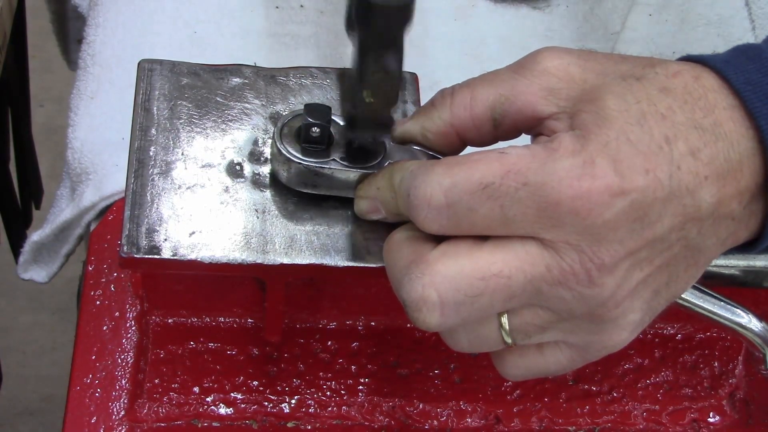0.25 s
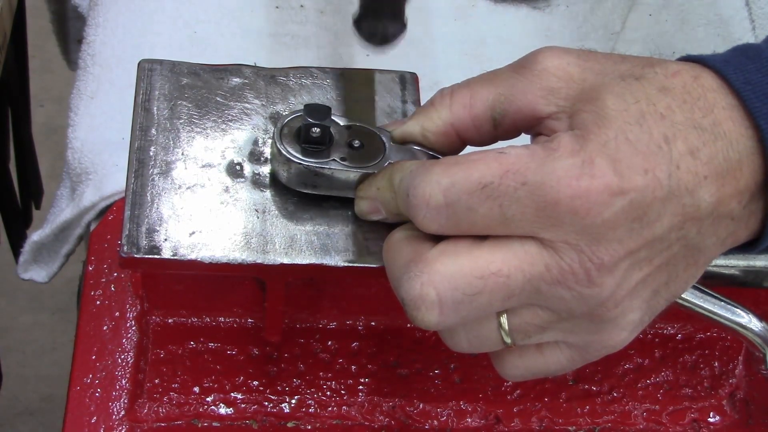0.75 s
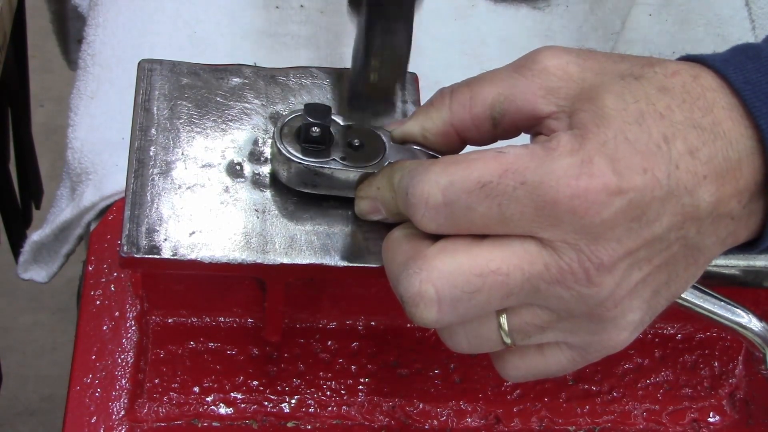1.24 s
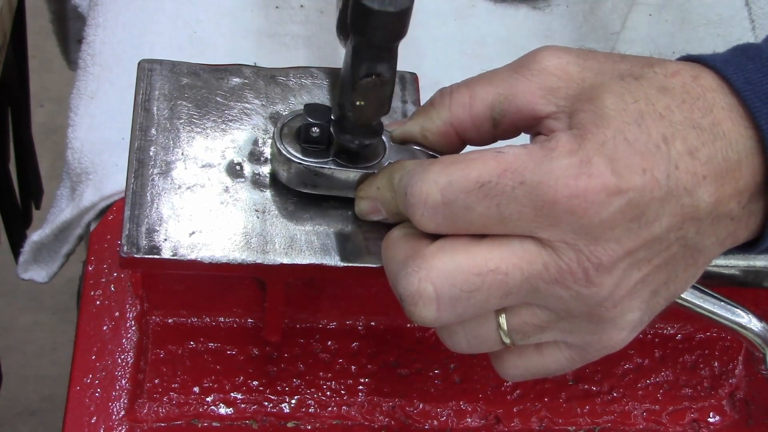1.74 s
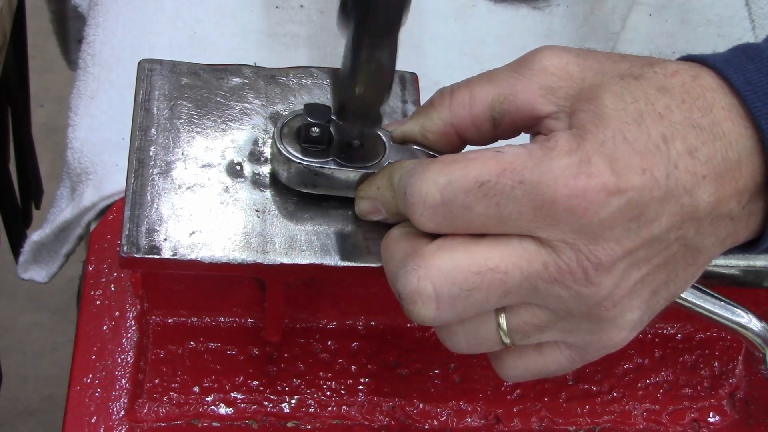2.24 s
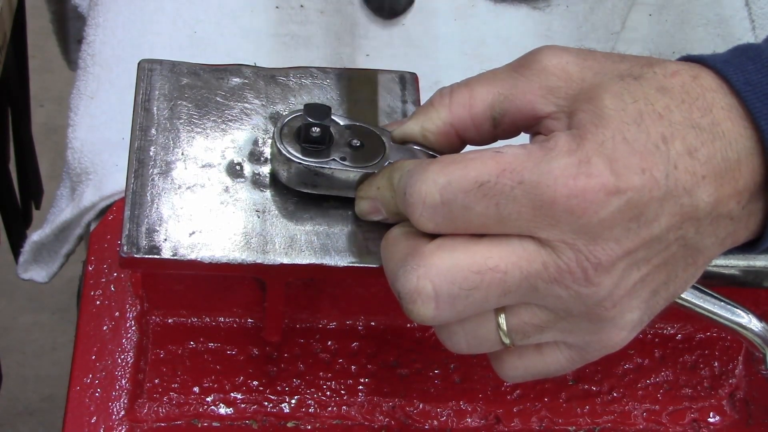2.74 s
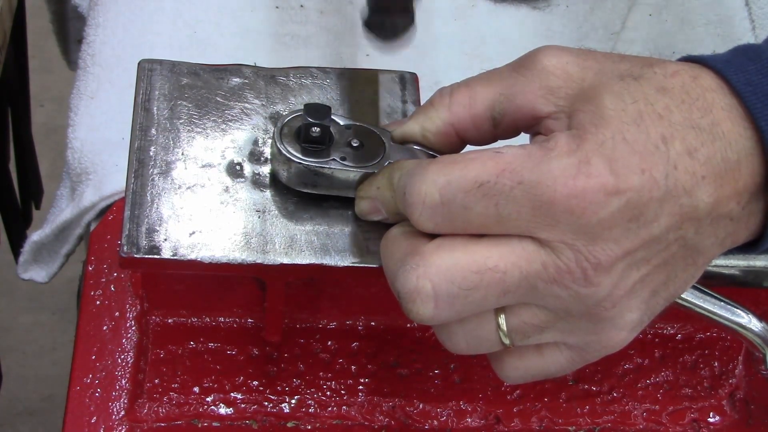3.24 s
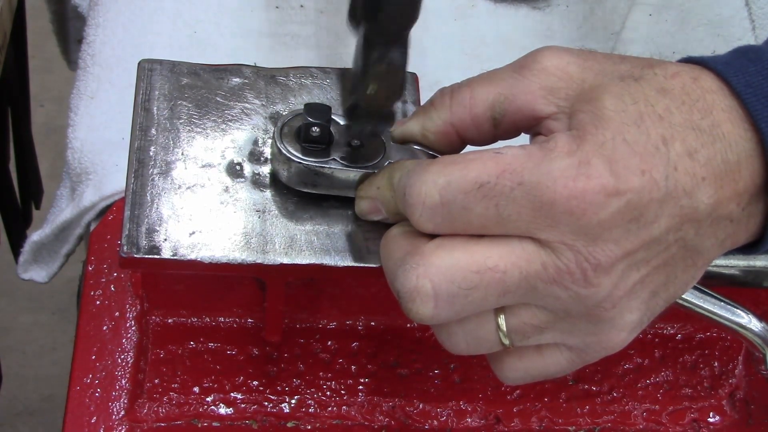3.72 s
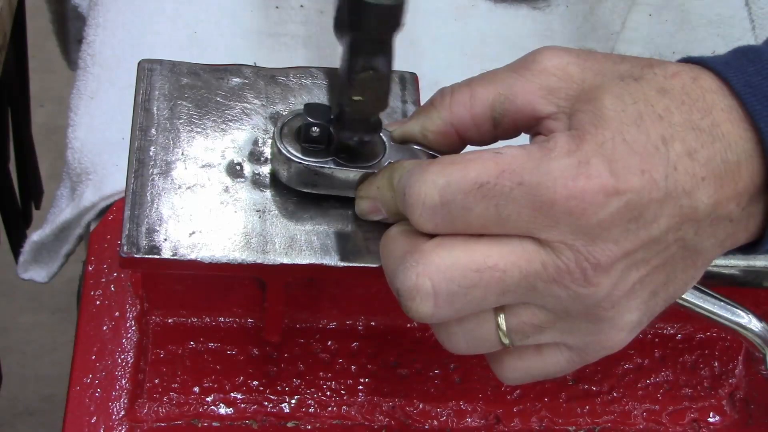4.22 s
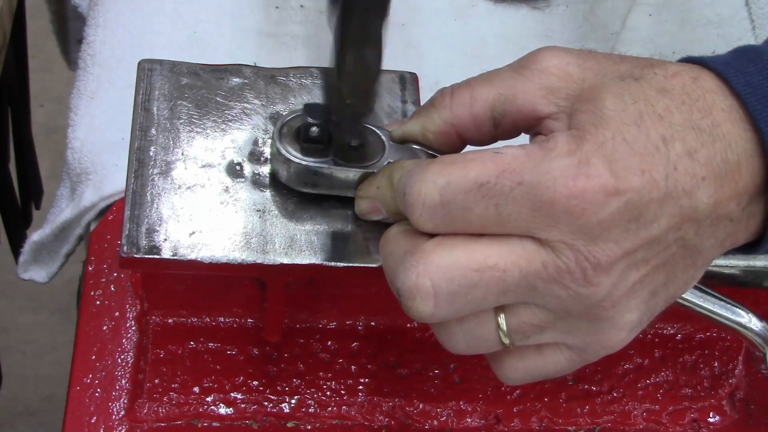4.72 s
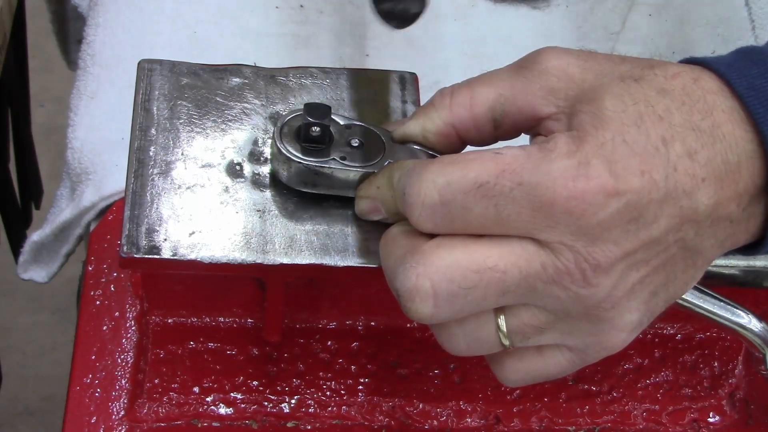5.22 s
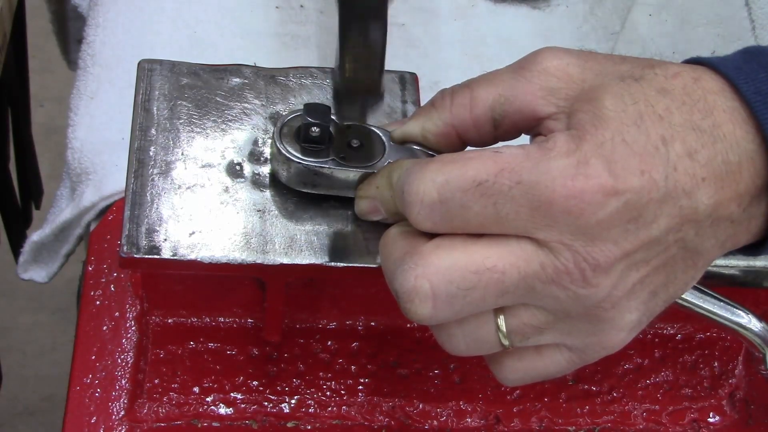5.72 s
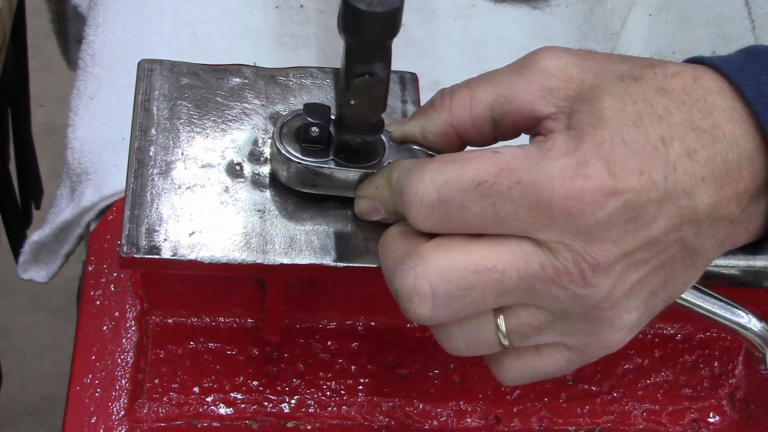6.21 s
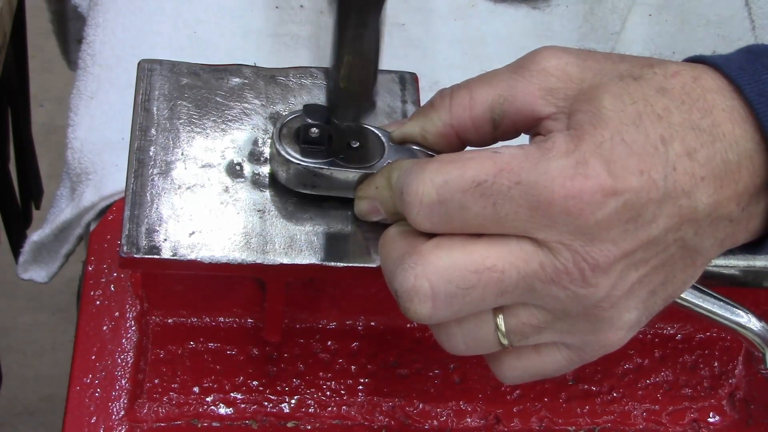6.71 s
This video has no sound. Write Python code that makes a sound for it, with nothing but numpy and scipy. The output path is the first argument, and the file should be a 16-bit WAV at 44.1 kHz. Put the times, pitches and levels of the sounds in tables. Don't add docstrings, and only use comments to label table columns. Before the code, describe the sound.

A small hammer strikes a steel pin in a link held on an anvil, close to the microphone, at an even three to four blows a second. Each blow is a sharp tick and hard, choked clank, often followed by a lighter rebound click, with a dull bench thud beneath. A bare workshop answers with short bright reverberation, swelling slightly after the loud hits, over faint building murmur.

```python
import sys
import numpy as np
from scipy import signal
from scipy.fft import rfft, irfft
from scipy.io import wavfile
from scipy.ndimage import uniform_filter1d, minimum_filter1d

SR = 44100
rng = np.random.default_rng(int(sys.argv[2]) if len(sys.argv) > 2 else 0)


def rack_gain(trim_db):
    fader = np.asarray(trim_db, float)
    return 10 ** (fader / 20)


def wav_record(signal):
    frames = np.transpose(np.atleast_2d(signal))
    bounded = np.clip(frames, -1, 1)
    quanta = np.round(bounded * 32767).astype(np.int16)
    wavfile.write(sys.argv[1], SR, quanta)


N = 306936
LEAD = SR // 2

# start in seconds, peak in dB.
HAMMER_TICKS = [(.5630, 7), (0.8485, 0), (0.855, -10), (1.1587, 5), (1.166, -9.5), (1.7190, -1),
                (2.0090, 0), (2.8404, 5.5), (3.1239, 3.5), (3.3918, 7), (3.4015, -12), (3.6805, -0.5),
                (3.9430, 5.5), (4.231, 9), (4.498, 5), (4.771, 7), (5.3386, 3.5), (5.348, -8), (5.6310, -2),
                (5.9162, -0.5), (6.2020, -2), (6.4633, -1.5), (6.47, -5.5), (6.7620, 2.5)]
# start in seconds, ring in dB, upper modes in dB, link clang in dB.
LINK_SLAMS = [(-.2900, 5.5, 15, -15), (-.0080, 0, -6, -1.5), (.2840, 0, -5, 0.5), (0.5659, -4.5, 1, 7.5),
              (.8500, -6.5, 3.5, 2.5), (1.1600, -6.5, 0, 6), (1.444, 6, -3, -2.5), (1.7239, 6.5, -5.5, 4.5),
              (2.0123, 9, -2, 2.5), (2.2876, 8, -3.5, 2), (2.5687, 9.5, -1, 5), (2.8415, 10, -2, 3.5),
              (3.1261, 8, -4, 2.5), (3.393, -8, 1, 12.5), (3.685, 7.5, -3.5, 5), (3.9470, 8.5, -2, 4.5),
              (4.237, 5.5, -4.5, 0), (4.5020, 10, -4, 2.5), (4.775, -2.5, -0.5, 1.5), (5.0549, 8, -4, 4),
              (5.34, -1, -9, -19), (5.637, 6, -1, 5), (5.9200, .5, -6.5, 1.5), (6.2057, 6, -2, 3.5),
              (6.4660, -4.5, -4, -1), (6.7734, -5.5, -2.5, 1)]
# start in seconds, ring in dB, upper modes in dB, link clang in dB.
LINK_BOUNCES = [(.3030, -11, -11, -15), (0.5887, -5, -3, 4.5), (.8640, -9, -12, 4), (1.1701, -11, -15, -2),
                (1.4642, -3, -6, 4), (1.7395, -7.5, 1.5, 7.5), (2.0322, -2, -6, 5), (2.305, -13, -17, 10),
                (2.589, -6, -1, 5.5), (2.8618, -10, 1, 3), (3.147, -2.5, -5, 6.5), (3.3995, -1, 1, -2.5),
                (3.4220, -11.5, -10, 2), (3.7186, -6, -17, -6.5), (3.9680, -10, -3.5, 6.5),
                (4.257, -4, -9, 5.5), (4.5225, 1.5, -8, 2), (4.788, -10, -8, 8), (5.0924, -12, -8, 10),
                (5.6693, -4, -10.5, 3), (6.2250, -5.5, -12, -1), (6.7920, -7, -10, -4.5)]

# frequency in Hz, level in dB, T60 in seconds.
PIN_MODES = [(1630, -13, 0.0097), (3666, -16, 0.049), (4367, -4, 0.011), (4844, -7, 0.0094),
             (7150, -12, 0.012), (9220, -7, 0.0032), (10350, -14.5, 0.0041), (12250, -23, 0.009)]
ANVIL_MODES = [(1246, -18, 0.068), (1600, -39, 0.026), (1621, -18.5, 0.073), (1694, -24.5, 0.17),
               (1937, -24, 0.077), (2355, -6.5, 0.054), (2357, -5, .04), (2300, -54, 0.09),
               (3410, -19, 0.039)]
UPPER_MODES = [(3890, -7.5, 0.048), (4670, -13.5, 0.029), (4860, -24, 0.013), (5384, -2, 0.035),
               (6410, -24, 0.11), (7700, 1, 0.012), (7910, -0.5, 0.024), (8190, -9, 0.012),
               (9970, -25.5, 0.092), (11400, -19, 0.019), (13600, -41, .02), (14500, -36, .03)]
LINK_MODES = [(2734, -13, .045), (2860, -14, .025), (3090, -9, .025), (3220, -13, .025), (2956, -4, .04)]
BENCH_MODES = [(165, -13, 0.19), (255, 0, 0.15), (279.6, -2, 0.18), (329, -14, 0.11), (440, -5, 0.064),
               (508.6, -5.5, 0.08), (579, -4, 0.074), (614, -10, 0.074), (775.4, -5, 0.073),
               (896, -14.5, 0.32)]

# frequency in Hz, density in dB per Hz.
CRACK_SPECTRUM = [(600, -17.5), (1100, -19.5), (1650, -9.5), (2100, -26), (2700, 2.5), (3400, -4),
                  (4500, -9), (6500, -13), (8000, -31), (11000, -28), (14500, -29), (17000, -47)]
HUSH_SPECTRUM = [(40, -18), (100, -5), (300, 4), (1000, -9), (4000, -16), (12000, -41), (16000, -62)]
RUMBLE_SPECTRUM = [(20, -27), (40, -17), (60, -6), (85, -1), (130, -7), (300, -43)]

# frequency in Hz, level in dB, T60 in seconds, side level in dB.
ROOM_BANDS = [(119, -33.5, 1, -25), (238, -35.5, 0.27, -53), (516, -27, 0.89, -33), (1110, -36, 0.9, -23.5),
              (1667, -28.5, 0.99, -21.5), (2350, -39.5, 0.95, -16.5), (3520, -41, 0.72, -16.5),
              (5840, -39, 0.5, -11), (8040, -40, 0.26, -13.5), (11300, -50, 0.35, -39),
              (14900, -42.5, 0.27, -31)]
# delay in seconds, level in dB.
WALL_ECHOES = [
    (0.059, -23.5),
    (0.073, -27.5),
]

SPREAD_DB = 1
SLAM_THUD_DB, BOUNCE_THUD_DB, THUD_FOLLOWS = -14, -13, 0.16
SLAM_MS, BOUNCE_MS, SPREAD_MS_PER_S, HARD_MS_PER_DB = 4.3, 2.2, 0.35, 0.08
SLAM_CRACK_DB, TICK_CRACK_DB, CRACK_T60_S = -9, -15, 0.021
PIN_SEND_DB, RING_SEND_DB, CRACK_SEND_DB = -5.5, -5.5, 5.5
BUILD_S, ECHO_CUT_HZ = 0.0022, 5000
HUSH_DB, RUMBLE_DB = -42, -58.5
MIC_LOW_HZ, MIC_TOP_HZ, PORT_LAG_DB = 175, 15400, -29.5
CEILING_DB, SENSE_S, AHEAD_S, HOLD_S, RELEASE_DB_S = -4.5, 0.0021, 0.0018, 0.016, 285


def at_hz(table, column, hz):
    table = np.array(table)
    return np.interp(np.log(hz), np.log(table[:, 0]), table[:, column])


def coloured(spectrum, channels):
    size = LEAD + N
    hz = np.maximum(np.fft.rfftfreq(size, 1 / SR), 20)
    white = rfft(rng.standard_normal((channels, size)))
    noise = irfft(white * rack_gain(at_hz(spectrum, 1, hz)), size)
    return noise / noise.std()


def hush():
    return rack_gain(HUSH_DB) * coloured(HUSH_SPECTRUM, channels=2) * [[1], [rack_gain(-19)]]


def mic_rumble():
    rumble, sideways = coloured(RUMBLE_SPECTRUM, channels=2)
    return rack_gain(RUMBLE_DB) * (rumble + rack_gain(-16) * sideways * np.array([[1], [-1]]))


def landings():
    slams = [(*row, SLAM_THUD_DB, SLAM_MS) for row in LINK_SLAMS]
    bounces = [(*row, BOUNCE_THUD_DB, BOUNCE_MS) for row in LINK_BOUNCES]
    rows = np.array(slams + bounces)
    s, ring_db, upper_db, clang_db, thud_db, start_ms = rows[np.argsort(rows[:, 0])].T
    thud_db = thud_db + THUD_FOLLOWS * ring_db
    contact_ms = start_ms + SPREAD_MS_PER_S * s - HARD_MS_PER_DB * ring_db
    return s, ring_db, thud_db, upper_db, clang_db, contact_ms


def struck(modes, s, peak_db, contact_ms, grains, soft_hz):
    out = np.zeros(LEAD + N)
    when = rng.random((len(s), grains)) * np.clip(contact_ms, 0.05, 12)[:, None] / 1000
    when[:, 0] = 0
    at = LEAD + np.round((s[:, None] + when) * SR).astype(int)
    sign = rng.choice([-1, 1], at.shape)
    push = rng.uniform(0.87, 1, at.shape) * sign / np.sqrt(grains)
    luck = rng.standard_normal((len(s), len(modes)))
    for k, (hz, level_db, t60) in enumerate(modes):
        r = rack_gain(-60 / (t60 * SR))
        w = 2 * np.pi * hz / SR
        drive = np.maximum(np.abs((push * np.exp(1j * w * at)).sum(axis=1)), 0.45)
        strength = rack_gain(peak_db + level_db + SPREAD_DB * luck[:, k]) / drive
        clicks = np.full(LEAD + N, 1e-18)
        np.add.at(clicks, at, push * strength[:, None])
        out += signal.lfilter([0, np.sin(w)], [1, -2 * r * np.cos(w), r * r], clicks)
    return signal.sosfilt(signal.butter(4, soft_hz, fs=SR, output="sos"), out)


def anvil():
    s, ring_db, _, upper_db, clang_db, contact_ms = landings()
    body = struck(ANVIL_MODES, s, ring_db - 1.5, contact_ms, grains=8, soft_hz=5530)
    clang = struck(LINK_MODES, s, ring_db + clang_db + 0.5, contact_ms, grains=8, soft_hz=5530)
    upper = struck(UPPER_MODES, s, ring_db + upper_db - 2, contact_ms, grains=8, soft_hz=12000)
    return body + clang + upper


def crack():
    slam_s, ring_db = landings()[:2]
    tick_s, tick_db = np.transpose(HAMMER_TICKS)
    starts = np.zeros(LEAD + N)
    starts[LEAD + np.round(slam_s * SR).astype(int)] = rack_gain(ring_db + SLAM_CRACK_DB)
    starts[LEAD + np.round(tick_s * SR).astype(int)] += rack_gain(tick_db + TICK_CRACK_DB)
    fade = signal.lfilter([1], [1, -rack_gain(-60 / (CRACK_T60_S * SR))], starts)
    return fade * coloured(CRACK_SPECTRUM, channels=1)[0]


def bench():
    s, _, thud_db, _, _, contact_ms = landings()
    return struck(BENCH_MODES, s + 0.00195, thud_db - 4.5, contact_ms, grains=4, soft_hz=1510)


def pin():
    s, peak_db = np.transpose(HAMMER_TICKS)
    contact_ms = np.full(len(s), 1.3)
    return struck(PIN_MODES, s, peak_db + 0.5, contact_ms, grains=4, soft_hz=14100)


def evened(tail, fine_hz, broad_hz):
    spectrum = rfft(tail, 2 * SR)
    power = np.abs(spectrum) ** 2
    fine = uniform_filter1d(power, round(2 * fine_hz), axis=1) + 1e-15
    broad = uniform_filter1d(power, round(2 * broad_hz), axis=1) + 1e-15
    return irfft(spectrum * np.sqrt(broad / fine))[:, :SR]


def workshop(x):
    t = np.arange(SR) / SR
    white = rng.standard_normal((2, 2, SR))
    tail = np.zeros((2, SR))
    edges = 60 * 2 ** np.arange(0, 8.3, 1 / 3)
    for k, (low, high) in enumerate(zip(edges, edges[1:])):
        hz = np.sqrt(low * high)
        band_pass = signal.butter(2, [low, high], "band", fs=SR, output="sos")
        band = signal.sosfilt(band_pass, white[k % 2])
        lumps = uniform_filter1d(band ** 2, round(1.5 * SR / (high - low)), axis=1)
        band = band * (lumps.mean() / (lumps + 0.05 * lumps.mean())) ** 0.5
        decay = rack_gain(at_hz(ROOM_BANDS, 1, hz) - 60 * t / at_hz(ROOM_BANDS, 2, hz))
        build_up = 1 - np.exp(-t / BUILD_S)
        tail += band * decay * build_up * [[1], [rack_gain(at_hz(ROOM_BANDS, 3, hz))]]
    tail = evened(tail, fine_hz=18, broad_hz=220)
    walls = np.zeros(SR)
    for delay_s, echo_db in WALL_ECHOES:
        walls[round(delay_s * SR)] = rack_gain(echo_db)
    tail[0] += signal.sosfilt(signal.butter(2, ECHO_CUT_HZ, fs=SR, output="sos"), walls)
    return signal.fftconvolve(x[None], tail, axes=1)[:, :len(x)]


def limiter(x):
    ahead, hold = round(AHEAD_S * SR), round(HOLD_S * SR)
    power = uniform_filter1d((x ** 2).mean(axis=0), round(SENSE_S * SR))
    over_db = np.maximum(10 * np.log10(np.abs(power) + 1e-12) - CEILING_DB, 0)
    held_db = -minimum_filter1d(-over_db, hold, origin=(hold - 1) // 2)
    ramp = RELEASE_DB_S * np.arange(len(held_db)) / SR
    cut_db = np.maximum.accumulate(held_db + ramp) - ramp
    cut_db = uniform_filter1d(np.roll(cut_db, -ahead), 2 * ahead + 1)
    return x * rack_gain(-cut_db)


def scene():
    ring, burst, thud, tick = anvil(), crack(), bench(), pin()
    direct = tick + ring + burst + thud
    spread = rack_gain(PIN_SEND_DB) * tick + rack_gain(RING_SEND_DB) * ring + rack_gain(CRACK_SEND_DB) * burst + thud
    mid, side = workshop(spread) + hush()
    mid = mid + direct
    side = side + rack_gain(PORT_LAG_DB) * (np.roll(direct, 1) - np.roll(direct, -1))
    low_cut = signal.butter(4, MIC_LOW_HZ, "high", fs=SR, output="sos")
    top_cut = signal.butter(8, MIC_TOP_HZ, fs=SR, output="sos")
    heard = signal.sosfilt(low_cut, [mid + side, mid - side])
    heard = signal.sosfilt(top_cut, heard) + mic_rumble()
    return limiter(heard)[:, LEAD:]


def band_limit(x):
    return signal.sosfilt(signal.butter(12, 16660, fs=SR, output="sos"), x)


def record(dry):
    mix = np.clip(dry, -1, 1)
    return band_limit(mix)


dry = scene()
out = record(dry)
wav_record(out)
```